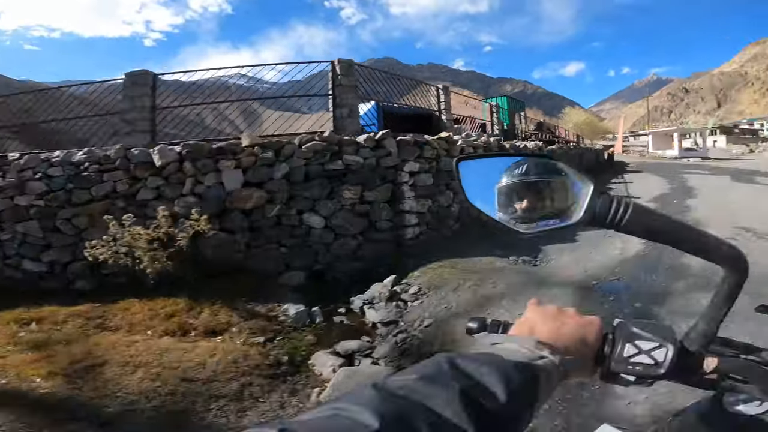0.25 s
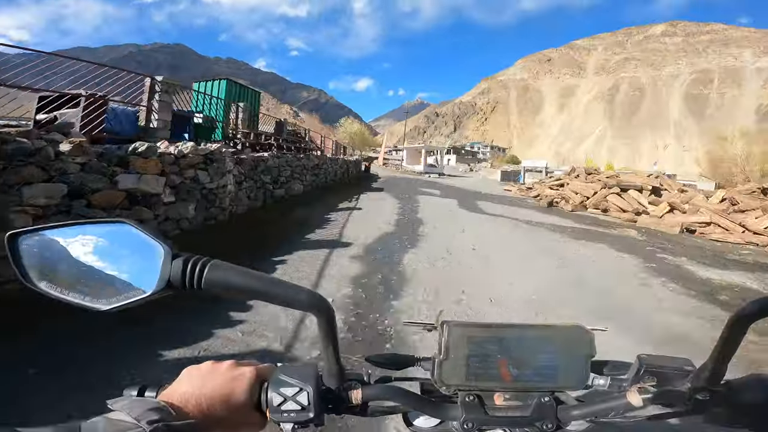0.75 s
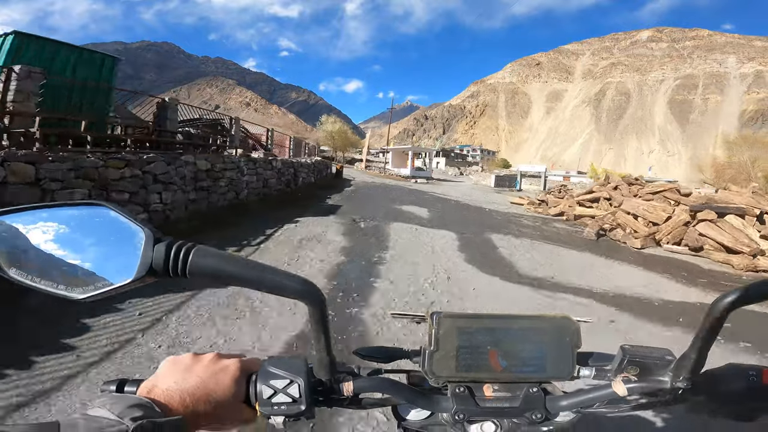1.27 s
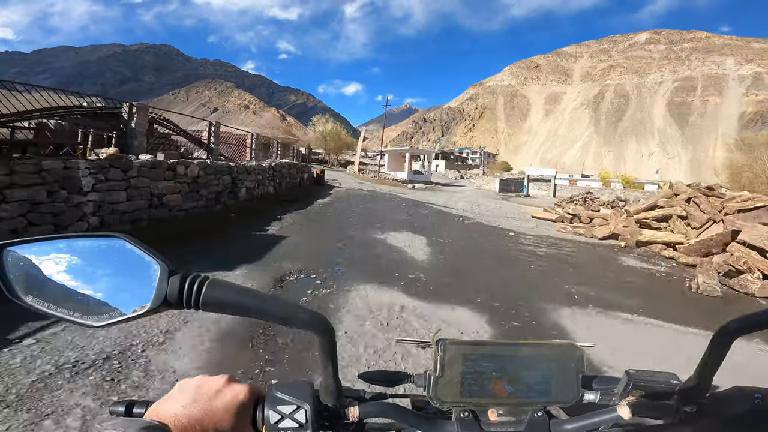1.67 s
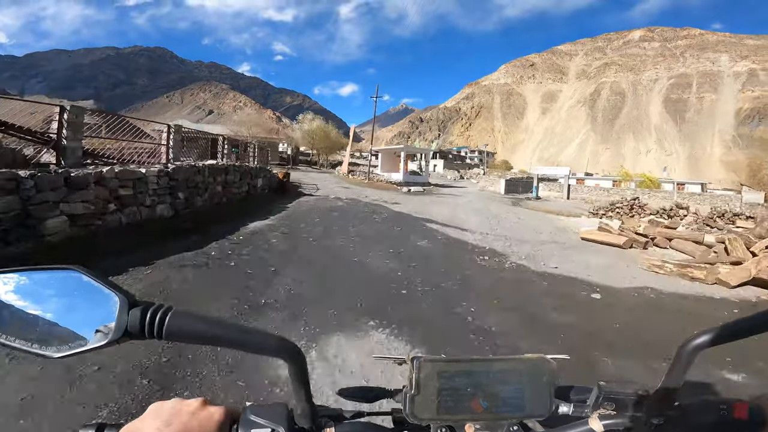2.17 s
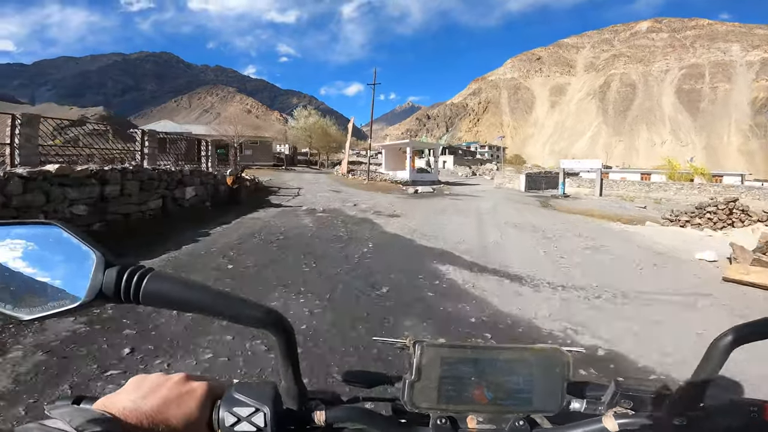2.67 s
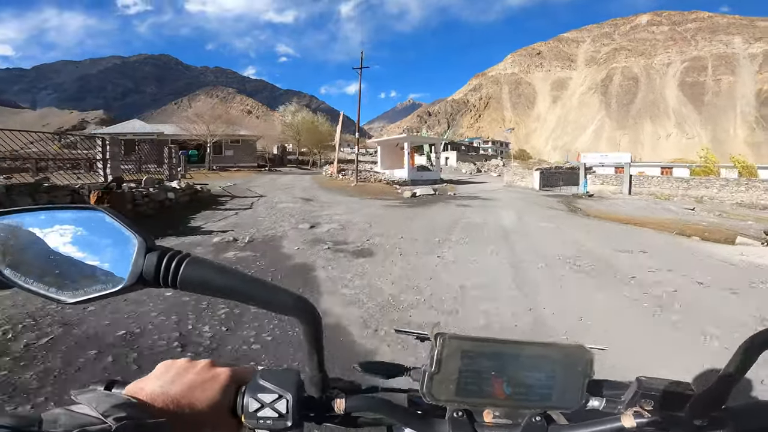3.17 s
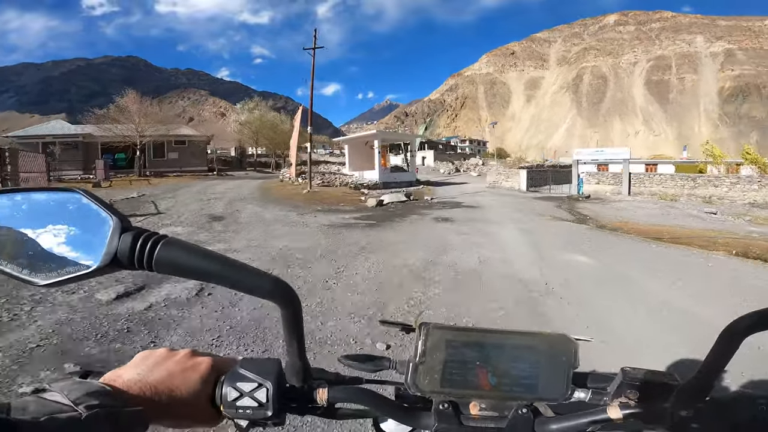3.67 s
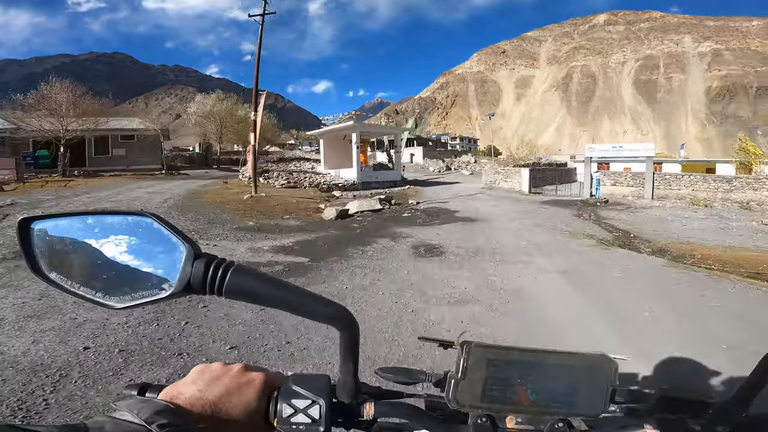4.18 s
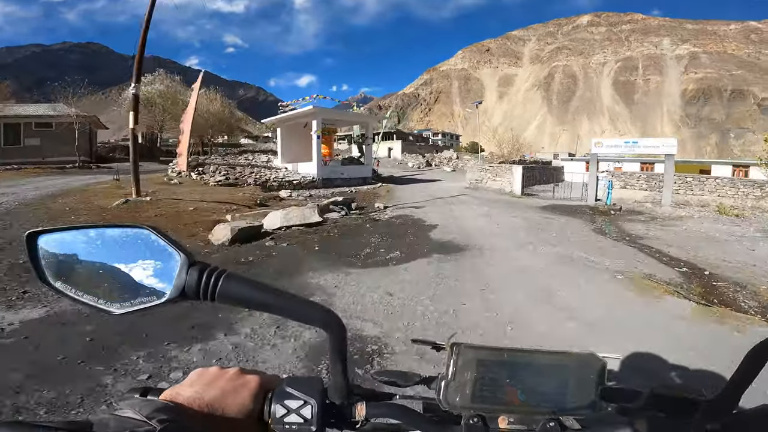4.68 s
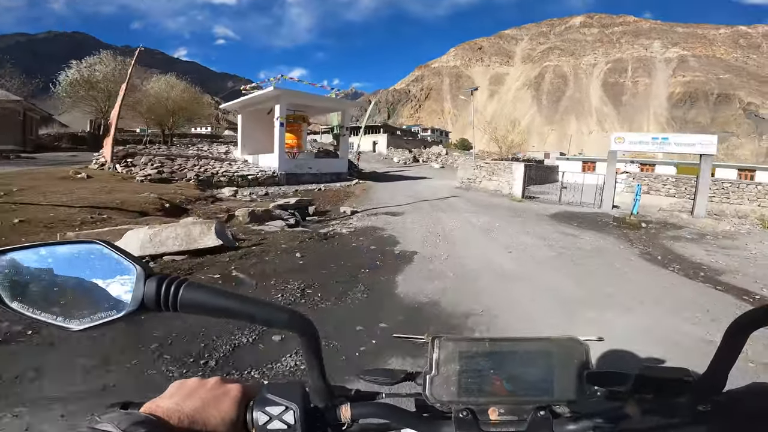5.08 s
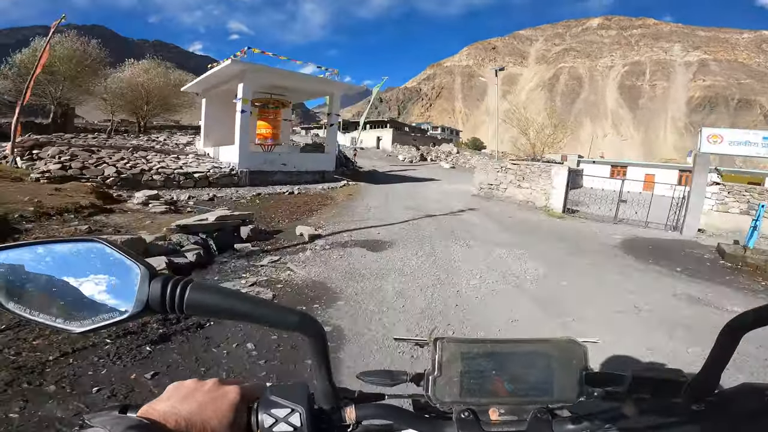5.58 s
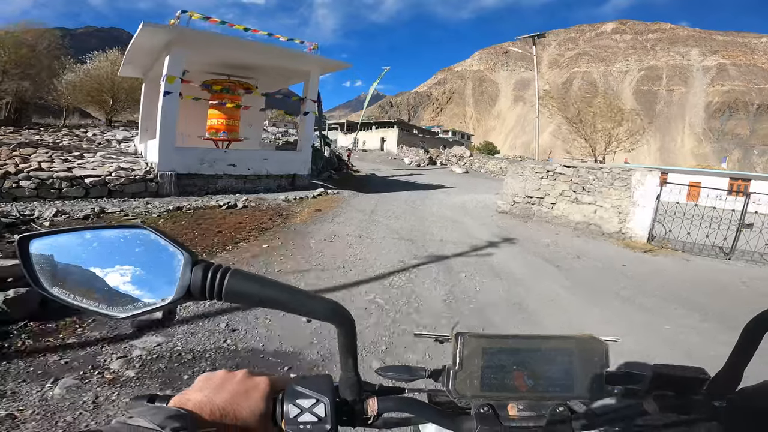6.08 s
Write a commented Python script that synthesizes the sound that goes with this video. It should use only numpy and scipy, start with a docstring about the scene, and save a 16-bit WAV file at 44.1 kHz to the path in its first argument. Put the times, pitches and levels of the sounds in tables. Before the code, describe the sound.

From the rider's helmet, a throbbing motorcycle engine slows then revs up over crunching gravel, with bumps, clacking stones and low wind rumble.

```python
"""On a gravel road, at the rider's helmet: a single-cylinder four-stroke motorcycle rolls slowly by a stone wall.
The engine slows on a closed throttle, then pulls again: each firing rings the exhaust, each intake gulp the airbox.
Tyres scrub out of a turn and crunch on, stones tick, bumps knock the chassis, a loose fitting buzzes with the crank,
gears whine, rubbing squeaks, and wind buffets the microphone. Noise is filtered, impulses ring resonances.
Curves of engine speed, engine load, roughness of the ride and rumble level drive most of it."""
import sys
import numpy as np
from scipy import signal
from scipy.fft import rfft, irfft, next_fast_len
from scipy.io import wavfile
from scipy.ndimage import uniform_filter1d

SR = 44100
rng = np.random.default_rng(int(sys.argv[2]) if len(sys.argv) > 2 else 0)


def materialize(psi):
    """Save the field psi as 16-bit PCM at rate SR to the path in sys.argv[1].

    A 1-D psi becomes a single channel; in a 2-D psi each row is a channel.
    """
    bounded = np.clip(np.atleast_2d(psi).T, -1, 1)
    quanta = np.round(bounded * 32767).astype(np.int16)
    wavfile.write(sys.argv[1], SR, quanta)


N = 279594
TIME = np.arange(N) / SR


def undb(db):
    """Decibels to gain."""
    return 10 ** (np.asarray(db) / 20)


def unit(x):
    """Scale to rms 1."""
    return x / np.sqrt(np.mean(x ** 2))


def curve(table):
    """Rows (time [s], value), joined by straight lines."""
    return np.interp(TIME, *np.transpose(table))


def noise():
    """White noise."""
    return rng.standard_normal(N)


def walk(rate):
    """Wandering curve of rms 1: random steps, `rate` a second, smoothed twice."""
    hold = max(int(SR / rate), 1)
    steps = noise()[np.arange(N) // hold]
    return unit(uniform_filter1d(uniform_filter1d(steps, hold), hold))


def colour(x, points):
    """Causal filter of (frequency [Hz], level [dB]) points, falling away above the last; keeps white noise's power."""
    hz, db = np.transpose(points)
    size = 2 * next_fast_len(N)
    octaves = np.log2(np.fft.rfftfreq(size, 1 / SR) + 1e-9)
    fall_db = 20 * np.maximum(octaves - np.log2(hz[-1]), 0)
    gain = unit(undb(np.interp(octaves, np.log2(hz), db) - fall_db))
    # folding the cepstrum makes the filter minimum phase
    cepstrum = irfft(np.log(gain))[:size // 2]
    cepstrum[1:] *= 2
    return irfft(rfft(x, size) * np.exp(rfft(cepstrum, size)))[:N]


def ring(x, modes):
    """Sum of resonances (frequency [Hz], width [Hz], level [dB])."""
    return sum(undb(db) * signal.lfilter(*signal.iirpeak(hz, hz / width, fs=SR), x) for hz, width, db in modes)


def strokes(phase, scatter_db):
    """One impulse of uneven size at each whole turn of the phase."""
    turns = np.diff(np.floor(phase), prepend=np.floor(phase[0])) > 0
    return turns * undb(scatter_db * np.clip(noise(), -2, 2))


def fade(x, decay_s):
    """Give each impulse an exponential tail."""
    return signal.lfilter([1], [1, -np.exp(-1 / (decay_s * SR))], x)


def blows(table):
    """Impulses from rows (time [s], level [dB])."""
    out = np.zeros(N)
    for s, db in table:
        out[int(s * SR)] += undb(db)
    return out


def spells(table):
    """A rounded swell and fade for each row (start [s], length [s], level [dB])."""
    out = 0
    for start, length, db in table:
        across = 2 * (TIME - start) / length - 1
        out = out + undb(db) * np.sqrt(np.maximum(1 - across ** 2, 0))
    return out


def soften(x, hz):
    """Steep low-pass: a push of gas has no sharp edge."""
    return signal.sosfilt(signal.butter(4, hz, fs=SR, output="sos"), x)


# spectrum of the wind at the microphone: (frequency [Hz], level [dB per Hz])
WIND = [(2, -10), (7, 0), (13, 0), (28, -7.5), (42, -14.5), (70, -19), (120, -29), (250, -48)]
# single puffs of wind that thump the microphone: (end [s], length [s], level [dB])
PUFFS = [(0.243, 0.077, -7.5), (0.424, 0.011, 1), (0.481, 0.062, -5.5), (0.544, 0.039, -1),
         (0.698, 0.034, -7.5), (2.194, 0.017, 0.5), (3.389, 0.012, -0.5), (5.268, 0.15, -6.5)]
# level at 0 dB rumble [dB], and dB gained for each dB of rumble
WIND_DB, WIND_PER_RUMBLE = -16.5, 0.69


def wind(rumble):
    """Slow eddies push on the microphone, swelling and dropping with the rumble; now and then a puff tugs at it."""
    eddies = colour(noise(), WIND)
    # even out the eddies so that the level curve sets their swells
    strength = np.sqrt(uniform_filter1d(eddies ** 2, int(.16 * SR)))
    level = undb(WIND_DB + WIND_PER_RUMBLE * rumble + 1.45 * walk(9))
    pulls = 0
    for end, length, db in PUFFS:
        # suction builds, then lets go at once
        pulls = pulls + undb(db) * np.clip(1 + (TIME - end) / length, 0, 1) * (TIME < end)
    edge = np.hanning(int(0.009 * SR))
    puffs = signal.fftconvolve(pulls, edge / edge.sum(), "same")
    return eddies / strength * level - puffs


# spectrum of tyre crunch: (frequency [Hz], level [dB per Hz])
CRUNCH = [(1500, -15), (3000, -6), (4400, -6.5), (5700, -5), (6150, 2), (8000, -1), (10000, 0),
          (12800, -.5), (15500, -8)]
# spectrum of rough ground drumming through tyres and frame: (frequency [Hz], level [dB per Hz])
ROAD = [(40, -20), (100, -3), (140, 2), (260, -1), (330, -5), (480, -13.5), (900, -31), (3000, -98)]
# thin metal parts that the road keeps ringing: (frequency [Hz], width [Hz], level [dB])
METAL = [(2795, 18, 4), (6150, 31, -1), (10050, 73, -5), (12000, 60, -5)]
# the tyres scrub sideways through the opening turn: (start [s], length [s], level [dB])
TURN = [(0, 0.57, -51.5)]
# spectrum of that scrub: (frequency [Hz], level [dB per Hz])
SCRUB = [(500, 6), (1200, 9), (1700, 9), (2300, -1), (3700, -10), (5000, -8), (7000, -5.5), (14000, -20)]
# crunch and metal at 0 dB ride, drumming at 0 dB rumble [dB]
CRUNCH_DB, METAL_DB, DRUMMING_DB = -60.5, -74, -31.7


def tyres(ride, rumble):
    """Grit cracks under the tread while rough ground drums through tyres and frame and rings thin metal parts."""
    cracks = rng.random(N) < 1400 / SR  # 1400 a second on average
    grit = cracks * noise() * undb(1.9 * np.minimum(rng.exponential(size=N), 4))
    tread = noise() + 0.36 * unit(grit)
    crunch = unit(colour(tread, CRUNCH)) * undb(CRUNCH_DB + ride)
    metal = unit(ring(tread, METAL)) * undb(METAL_DB + ride)
    drumming = colour(noise(), ROAD) * undb(DRUMMING_DB + rumble + 1.8 * walk(22))
    scrub = unit(colour(tread, SCRUB)) * spells(TURN)
    return crunch + metal + drumming + scrub


# faint squeaks of rubbing, like tread or brake: (start [s], length [s], level [dB], pitch [Hz])
SQUEAKS = [(.1, .16, -61, 3600), (.4, .17, -56, 1835), (.56, .066, -56, 2650), (5.85, .3, -67, 4520),
           (6.08, .45, -63.5, 5000)]


def squeaks():
    """Rubbing rings a narrow band that swells, flutters and fades."""
    out = 0
    for start, length, db, hz in SQUEAKS:
        band = [(hz, .14 * hz, 0)]
        rubbing = ring(ring(noise(), band), band)
        flutter = undb(3 * walk(18))
        out = out + unit(rubbing * flutter) * spells([(start, length, db)])
    return out


# a patch of loose gravel sprays fine chips: (start [s], length [s], relative level [dB])
GRAVEL = [(4.55, 5.8, -56.5)]
# spectrum of chips and of the loose fitting: (frequency [Hz], level [dB per Hz])
FITTING = [(2000, 0), (4000, -1), (5700, -2), (6100, 5.5), (6700, 2.5), (8700, 3), (10200, 5.5), (13000, 2),
           (15500, -3)]
CHIPS_PER_S = 120


def chips():
    """Fine chips of uneven size patter on the bike."""
    sizes = undb(3.5 * np.clip(noise(), -2, 2))
    hits = (rng.random(N) < CHIPS_PER_S / SR) * sizes * spells(GRAVEL)
    return colour(noise() * fade(hits, decay_s=.0025), FITTING)


# stones flicked by the tyres: (time [s], relative level [dB])
STONES = [(.908, -47.5), (1.458, -47), (1.801, -34), (2.016, -44), (2.091, -41.5), (3.62, -47), (4.14, -45),
          (4.871, -45), (5.025, -38), (6.078, -39)]
# spectrum of their ticks: (frequency [Hz], level [dB per Hz])
STONE = [(2500, -36), (5500, -12), (6400, -1.5), (8200, -1), (10000, -5), (13000, -10), (15500, -6)]
# stones that strike the bike: (time [s], peak level [dB], pitch [Hz])
CLACKS = [(1.166, -31, 990), (1.984, -24, 790), (4.253, -24, 785), (6.079, -30, 2630), (6.109, -23.5, 755)]


def stones():
    """Short bright ticks of flicked stones; some strike a panel of the bike with a lower clack."""
    ticks = colour(noise() * fade(blows(STONES), decay_s=0.0071), STONE)
    clacks = 0
    for s, db, hz in CLACKS:
        panel = [(hz, 0.57 * hz, 0)]
        clack = ring(ring(blows([(s, 0)]), panel), panel)
        clacks = clacks + undb(db) * clack / np.abs(clack).max()
    return undb(-6.5) * ticks + clacks


# bumps that knock the chassis: (time [s], relative rattle level [dB], relative thud level [dB])
BUMPS = [(1.86, -32.5, -18), (1.908, -30.5, -21), (1.981, -29, -18.5), (2.027, -31, -24),
         (2.211, -30.5, -32), (2.882, -42, -23), (3.364, -25.5, -14.5), (3.923, -30, -19.5),
         (6.108, -32, -24.5)]
# spectrum of rattling parts, engine casing and frame alike: (frequency [Hz], level [dB per Hz])
CLATTER = [(150, 13.5), (300, 14.5), (585, 5), (680, 2), (850, 4.5), (1250, 1), (1600, -5), (1850, -8),
           (2080, -15.5), (2600, -13), (3400, -20), (4500, -29.5), (8000, -31)]


def cushioned(column):
    """The tyre cushions each blow of a bump, spreading it over a short tail."""
    hits = blows(np.array(BUMPS)[:, [0, column]])
    return fade(hits, decay_s=.005) / (.005 * SR)


def bumps():
    """Each bump thuds through the frame and shakes its metal parts."""
    rattle = colour(noise() * fade(cushioned(1), decay_s=0.0084), CLATTER)
    thud = colour(noise() * fade(cushioned(2), decay_s=0.02), ROAD)
    return undb(7.5) * rattle + undb(1.5) * thud


# spells when the loose fitting buzzes: (start [s], length [s], relative level [dB])
BUZZES = [(2.561, 0.079, -41.5), (2.645, 0.06, -46), (2.857, 0.081, -46), (3.91, 0.056, -55),
          (4.655, 0.042, -52), (4.745, 0.05, -52), (5.04, 0.053, -54), (5.1, 0.061, -53), (5.2, .045, -54),
          (5.243, 0.023, -44.5), (5.497, 0.021, -52), (5.595, 0.12, -59), (5.638, 0.019, -49),
          (5.74, 0.05, -51.5), (5.82, 0.21, -55)]


def fitting(cycle, load):
    """A loose part strikes once a crank turn and rebounds, less when the engine pulls; it rings the thin metal."""
    rebound = undb(-.9 * np.maximum(load, 0))
    strikes = strokes(2 * cycle - .46, scatter_db=1)
    contacts = strikes + rebound * strokes(2 * cycle + .04, scatter_db=1.5)
    # each contact is a short, grainy scrape
    grain = unit(noise() * undb(2 * walk(900)))
    scrapes = grain * uniform_filter1d(fade(contacts * spells(BUZZES), decay_s=.0042), size=70)
    return undb(4.5) * colour(scrapes, FITTING) + undb(12) * ring(scrapes, METAL)


# spells when the gears whine: (start [s], length [s], level [dB])
WHINES = [(2.52, .14, -24.5), (2.4, 1.2, -36), (3.9, 1.94, -35.5)]
PUMP_HZ, PUMP_DB = 1103, -58  # mean pitch, level at 0 dB ride


def whines(cycle, ride):
    """Gear teeth sing in spells at multiples of the firing rate; a thin whine, like a fuel pump, holds its own pitch."""
    # the phase of each tone wavers
    low, *high = (unit(np.sin(2 * np.pi * k * cycle + .5 * walk(14))) for k in (12, 21, 22))
    teeth = (low + undb(-17) * sum(high)) * spells(WHINES) * undb(1 * walk(11))
    pump = np.sin(2 * np.pi * np.cumsum(PUMP_HZ + 5 * walk(25)) / SR)
    return teeth + unit(pump) * undb(PUMP_DB + ride + 2 * walk(23.16))


CLATTER_DB = -34.5  # at 0 dB ride


def clatter(cycle, ride):
    """Piston and valves rattle the casing twice a crank turn, over a steady rush."""
    taps = fade(strokes(4 * cycle, scatter_db=2.5), decay_s=.004)
    rush = noise() * (1 + .5 * taps)
    return unit(colour(rush, CLATTER)) * undb(CLATTER_DB + ride + 0.8 * walk(21.18))


REV_LAG_S = .14


def revving(speed):
    """How fast the engine has lately been speeding up, in Hz a second."""
    return fade(np.gradient(speed), REV_LAG_S) / REV_LAG_S


def wave(cycle, orders):
    """A pulse that starts at each whole cycle and rings down, from rows (multiple, level [dB])."""
    size = 512
    db = np.interp(np.arange(size // 2 + 1), *np.transpose(orders), right=-70)
    # minimum phase puts the energy at the start
    cepstrum = irfft(np.log(undb(db)))[:size // 2]
    cepstrum[1:] *= 2
    shape = irfft(np.exp(rfft(cepstrum, size)))
    pulses = np.interp(cycle, np.arange(size) / size, shape - shape.mean(), period=1)
    return unit(soften(pulses, hz=650))


# the pressure wave of one gulp of air: (multiple of the firing rate, level [dB])
GULP = [(1, -23.5), (2, -11), (3, -7), (4, -4.5), (5, 1.5), (6, -5), (7, -2), (8, -10.5), (9, -11.5),
        (11, -14), (16, -28.5), (24, -34)]
CRUISE_HZ = 27  # firings a second at which the levels below hold, at 0 dB load
# lugging favours the airbox: level [dB], dB per Hz of speed
INTAKE_DB, INTAKE_DB_PER_HZ = -28.5, -0.3
# the piston shakes the frame once a crank turn: level [dB], dB per dB of load
SHAKE_DB, SHAKE_PER_LOAD = -26.5, 0.2
# the second push: level [dB], dB per dB of load, per Hz of speed, per Hz a second of revving
BOOM_DB, BOOM_PER_LOAD, BOOM_DB_PER_HZ, BOOM_DB_PER_HZ_S = -31.5, 0.67, 0.63, -0.45


def engine(cycle, speed, load):
    """Each gulp of air booms in the airbox, and firing and piston inertia shake the frame."""
    faster = speed - CRUISE_HZ
    intake_db = INTAKE_DB + load + INTAKE_DB_PER_HZ * faster + .4 * walk(25)
    intake = wave(cycle - .76, GULP) * undb(intake_db)
    # each firing rocks the bike; the piston's inertia pushes once and twice a crank turn, two turns to a firing
    crank = 2 * np.pi * 2 * (cycle + .04)
    rocking = undb(5.5) * np.cos(crank / 2)
    shake = (np.cos(crank) + rocking) * undb(SHAKE_DB + SHAKE_PER_LOAD * load)
    boom_db = BOOM_DB + BOOM_PER_LOAD * load + BOOM_DB_PER_HZ * faster + BOOM_DB_PER_HZ_S * revving(speed)
    return intake + shake + np.cos(2 * crank) * undb(boom_db)


# resonances of the exhaust: (frequency [Hz], width [Hz], level [dB])
EXHAUST = [(113, 54, 0.5), (181.9, 30, 17.5), (281, 6.4, -0.5), (377, 76, -8)]
# how loud the exhaust is at the helmet: (time [s], level [dB])
TAILPIPE = [(0, -28.5), (.25, -26), (.34, -33), (.5, -25), (.65, -32.5), (.85, -36), (1.2, -27.5),
            (1.5, -38), (5.7, -40.5), (6.2, -29)]
# a stone wall beside the road echoes the exhaust: (time [s], distance [m], echo level [dB])
WALL = [(.27, 2.8, -8), (.42, 2.43, 3), (.56, 2.186, -2.5), (.8, 2.05, -20.5)]


def exhaust(cycle):
    """Each firing rings the exhaust; the echo from the wall shifts its note as the bike draws nearer."""
    firings = strokes(cycle - .69, scatter_db=.7)
    pipe = unit(soften(ring(firings, EXHAUST), hz=546)) * undb(curve(TAILPIPE))
    times, metres, echo_db = np.transpose(WALL)
    late = 2 * np.interp(TIME, times, metres) / 343  # there and back at the speed of sound, m/s
    echo = np.interp(TIME - late, TIME, pipe) * undb(np.interp(TIME, times, echo_db))
    return pipe + echo


# engine speed: (time [s], firings a second [Hz])
SPEED = [(0, 30.7), (.22, 30.35), (.36, 31.4), (.55, 30.8), (1, 31.95), (1.28, 32), (1.43, 27.8),
         (1.58, 23.3), (1.83, 19.86), (2.05, 19.87), (2.23, 20.5), (2.55, 27.3), (2.67, 29.7), (2.77, 26),
         (2.87, 27.93), (2.96, 26.12), (3.2, 26.56), (3.5, 26.75), (3.9, 26.58), (4.31, 27.25),
         (4.45, 25.52), (4.57, 27.03), (4.85, 27.26), (5.17, 28), (5.76, 27.96), (5.93, 29.24), (6.34, 29)]
# how hard the engine pulls: (time [s], load [dB])
THROTTLE = [(0, 7), (.8, -11), (1.25, -1), (1.6, -5.5), (1.9, 1.5), (2.15, 3.5), (2.4, 9), (2.68, 6),
            (2.95, 11), (3.2, 6), (3.5, -2), (4.1, -5.5), (4.4, 3.5), (5.4, -2.5), (6.34, 0)]
# how roughly the bike rolls; clatter and tyre crunch follow it: (time [s], level [dB])
RIDE = [(0, 3.5), (.58, 2), (.65, -0.5), (.8, -4.5), (1.3, -1.5), (2.1, 1), (2.75, 5), (3.4, 3.5),
        (3.55, 0.5), (4.3, -1.5), (4.95, 1), (5.4, -3), (5.75, 0), (6, 2)]
# low rumble of wind and ground together: (time [s], level [dB])
RUMBLE = [(0, 1), (.48, 4), (.8, -7.5), (.95, 0.5), (1.25, 1.5), (1.65, 1.5), (2, 3.5), (2.7, 0.5),
          (3.38, 4.5), (3.55, 1.5), (3.94, 5), (4.12, -0.5), (4.35, 0), (5.25, 3), (5.37, -3.5), (5.7, 2.5),
          (6.1, 6)]


def scene():
    """Road and wind around the bike, led by engine speed, engine load, roughness of the ride and low rumble."""
    speed, load, ride, rumble = curve(SPEED), curve(THROTTLE), curve(RIDE), curve(RUMBLE)
    cycle = np.cumsum(speed) / SR  # one whole cycle per firing
    road = wind(rumble) + tyres(ride, rumble) + squeaks() + chips() + stones() + bumps()
    bike = fitting(cycle, load) + whines(cycle, ride) + clatter(cycle, ride)
    bike = bike + engine(cycle, speed, load) + exhaust(cycle)
    return (road + bike)[None]


TOP_HZ = 15750


def record(dry):
    """The recorder rounds the highest peaks and cuts the top."""
    rounded = dry / (1 + (dry / .9) ** 6) ** (1 / 6)
    return signal.sosfilt(signal.ellip(10, .1, 80, TOP_HZ, fs=SR, output="sos"), rounded)


dry = scene()
out = record(dry)
materialize(out)
```